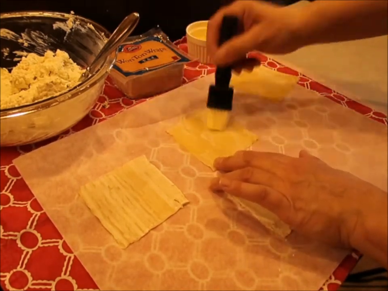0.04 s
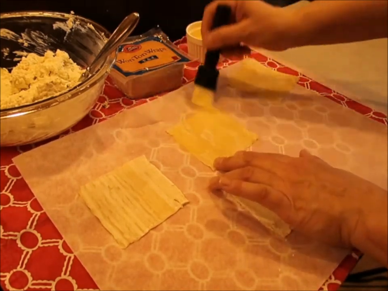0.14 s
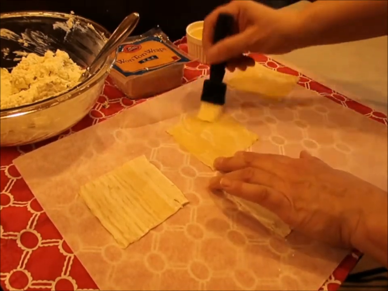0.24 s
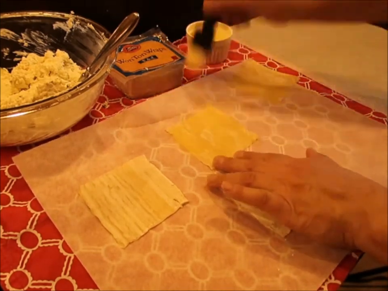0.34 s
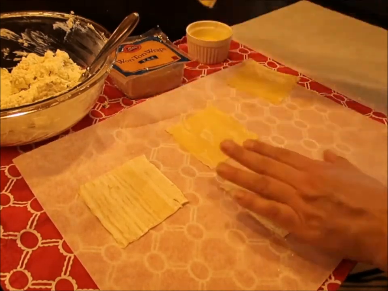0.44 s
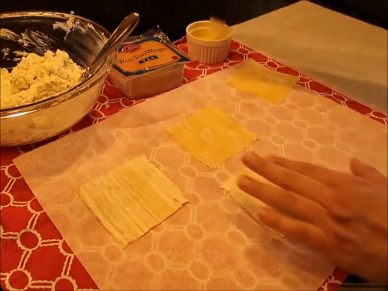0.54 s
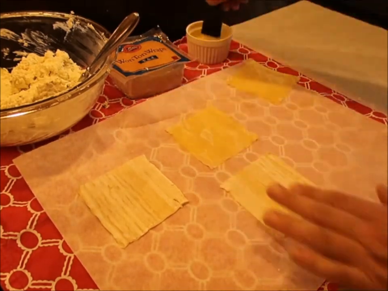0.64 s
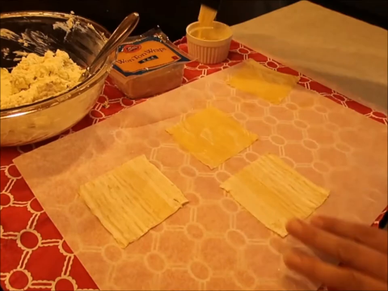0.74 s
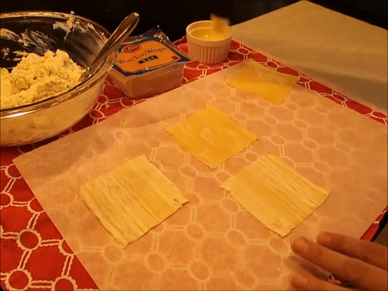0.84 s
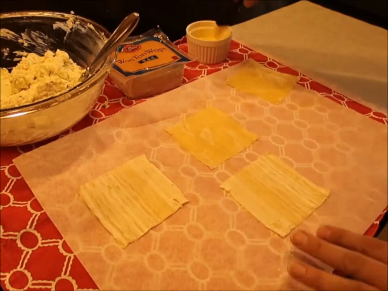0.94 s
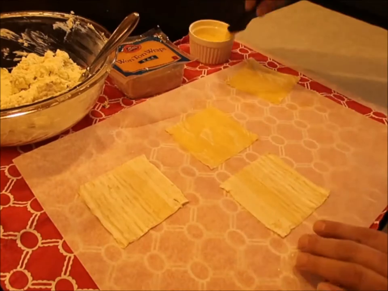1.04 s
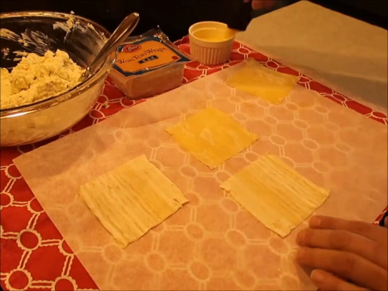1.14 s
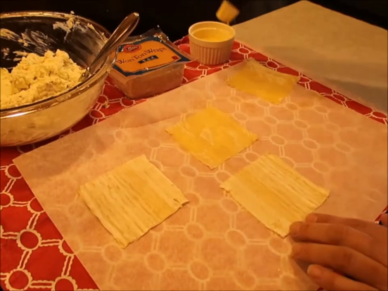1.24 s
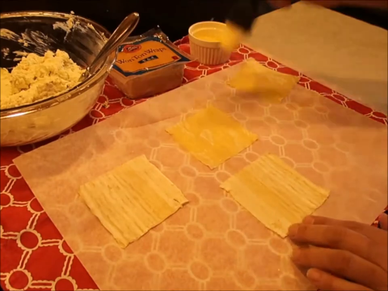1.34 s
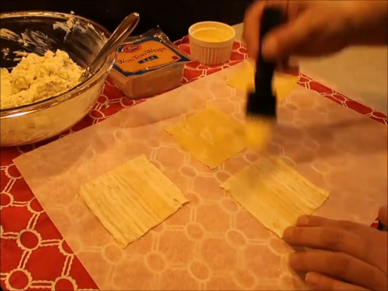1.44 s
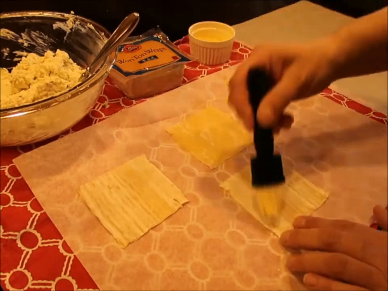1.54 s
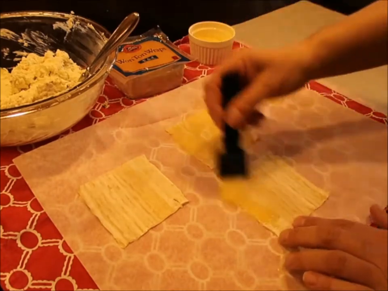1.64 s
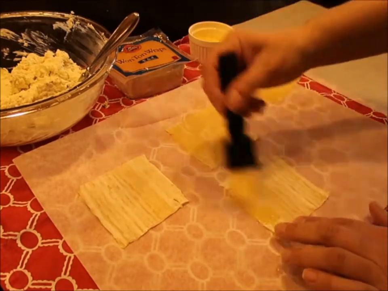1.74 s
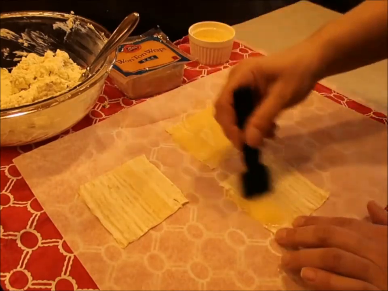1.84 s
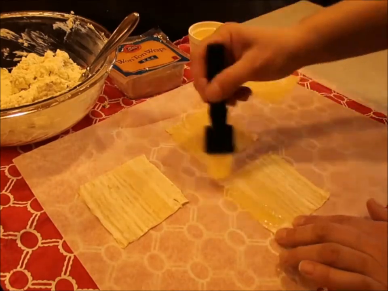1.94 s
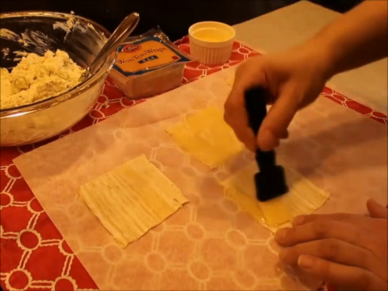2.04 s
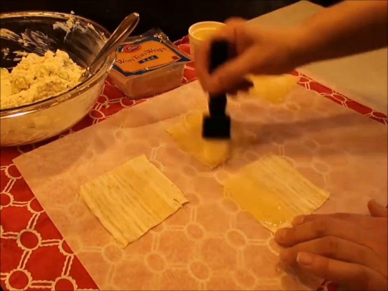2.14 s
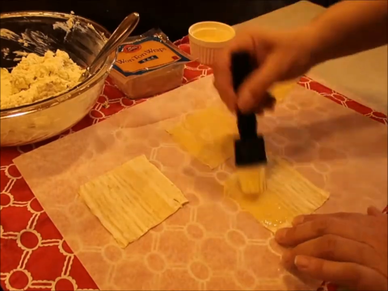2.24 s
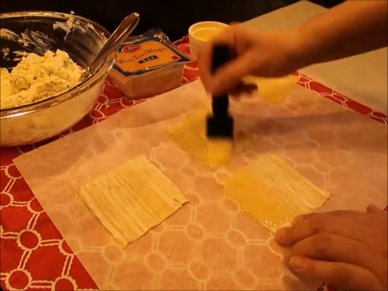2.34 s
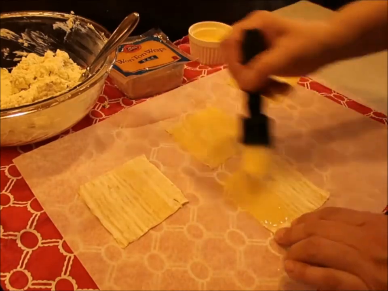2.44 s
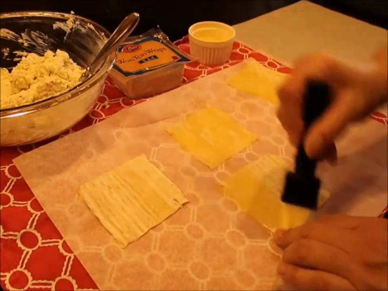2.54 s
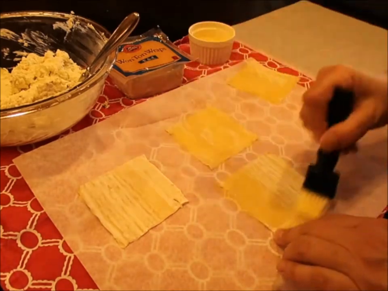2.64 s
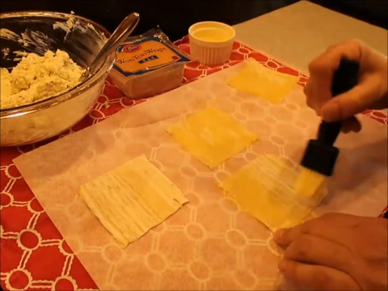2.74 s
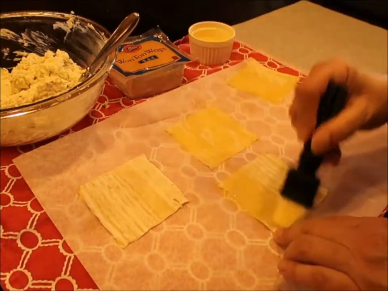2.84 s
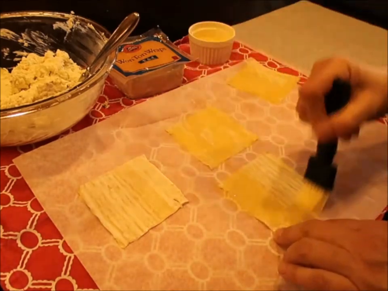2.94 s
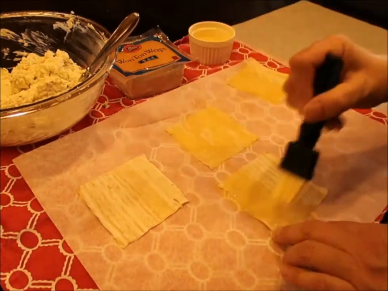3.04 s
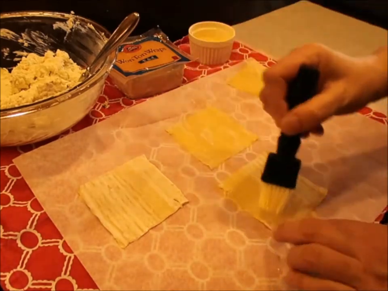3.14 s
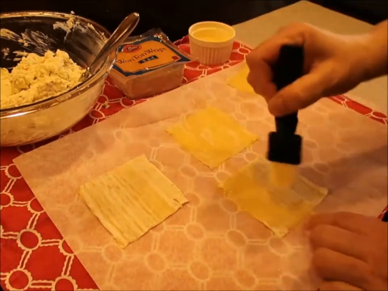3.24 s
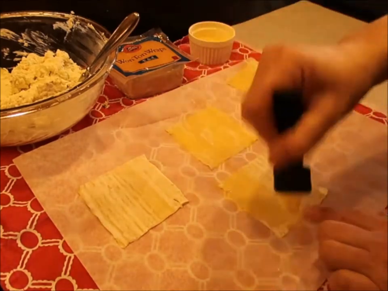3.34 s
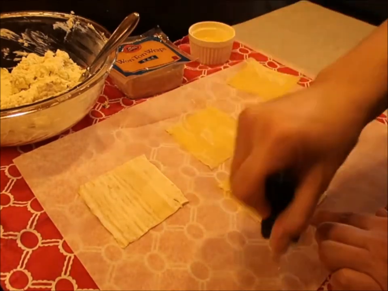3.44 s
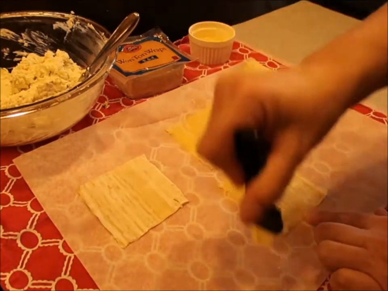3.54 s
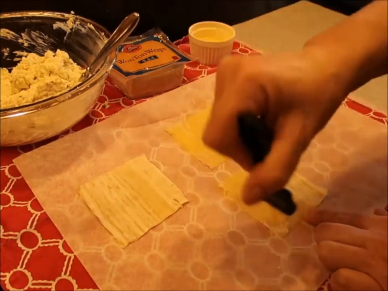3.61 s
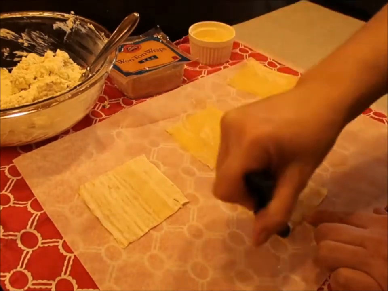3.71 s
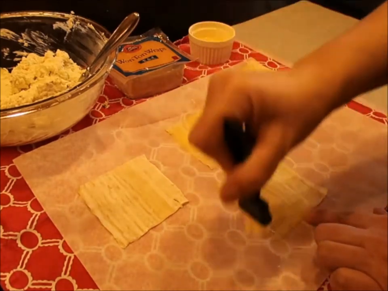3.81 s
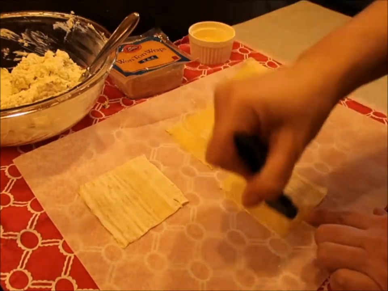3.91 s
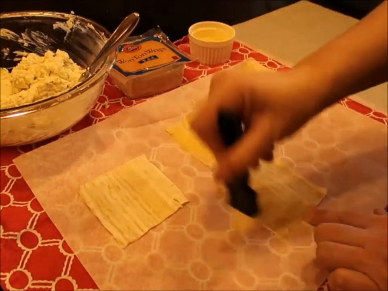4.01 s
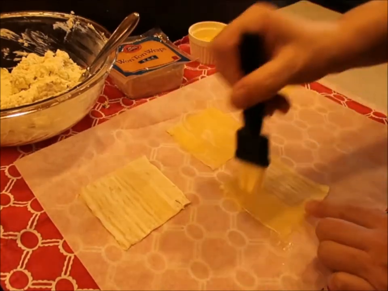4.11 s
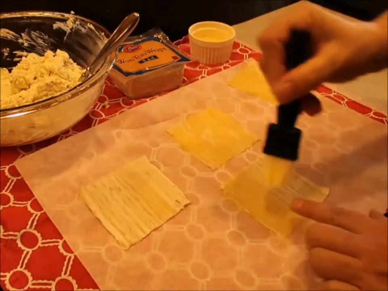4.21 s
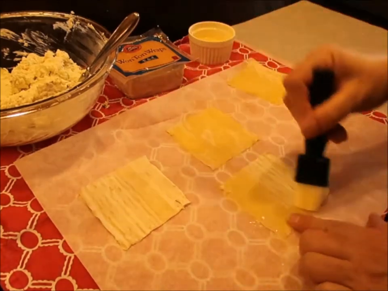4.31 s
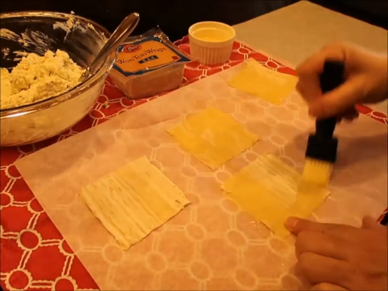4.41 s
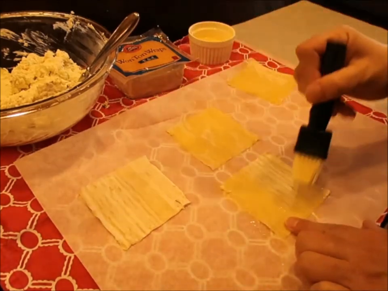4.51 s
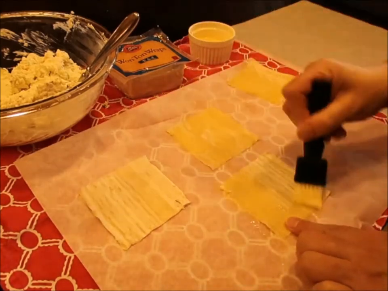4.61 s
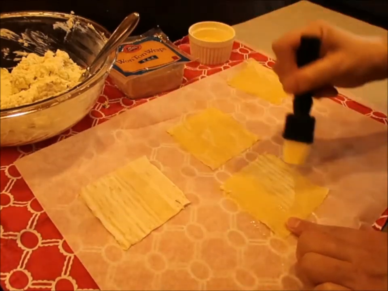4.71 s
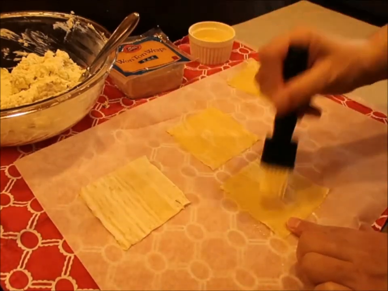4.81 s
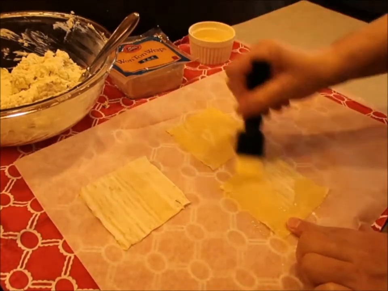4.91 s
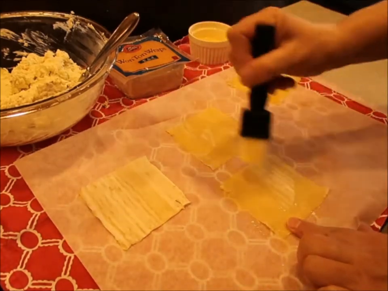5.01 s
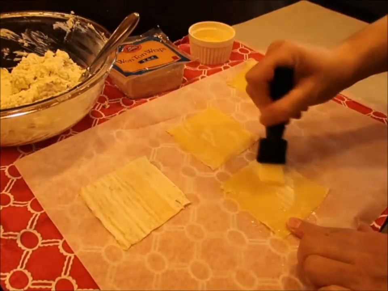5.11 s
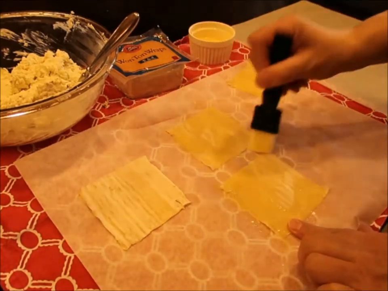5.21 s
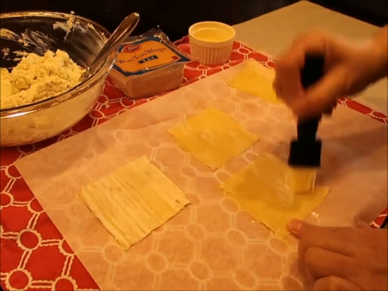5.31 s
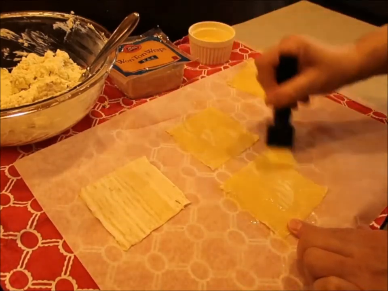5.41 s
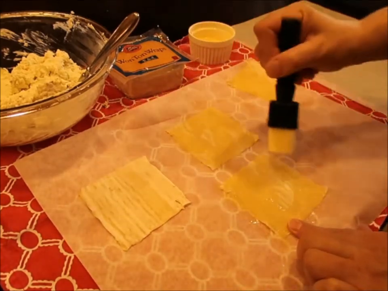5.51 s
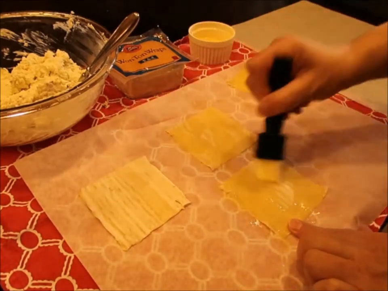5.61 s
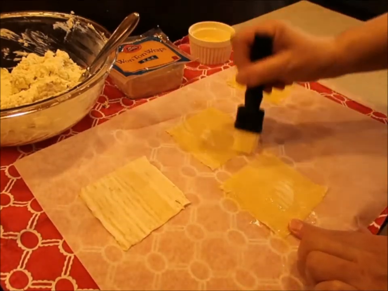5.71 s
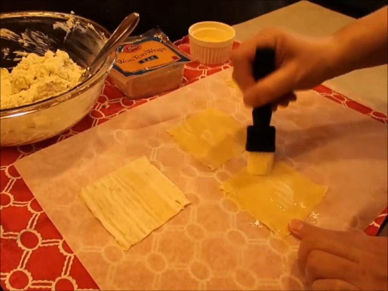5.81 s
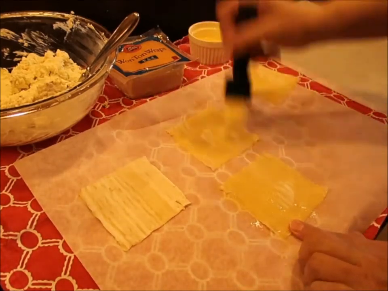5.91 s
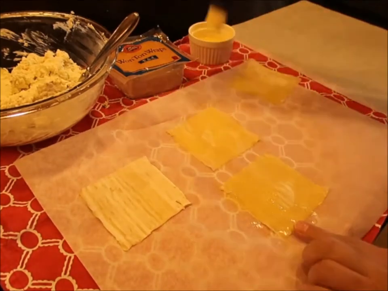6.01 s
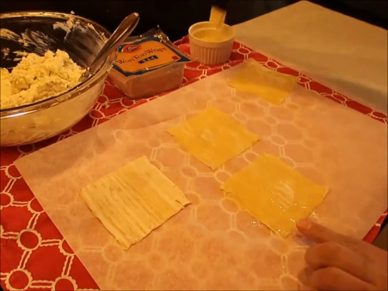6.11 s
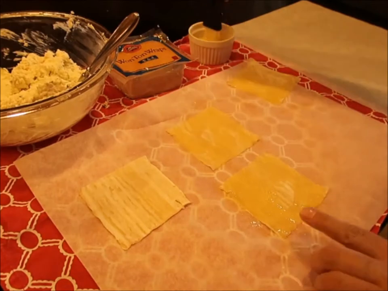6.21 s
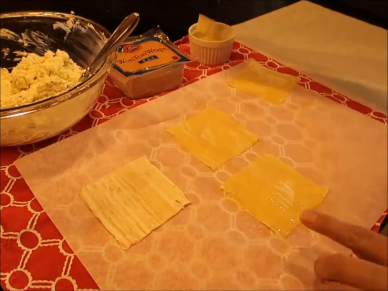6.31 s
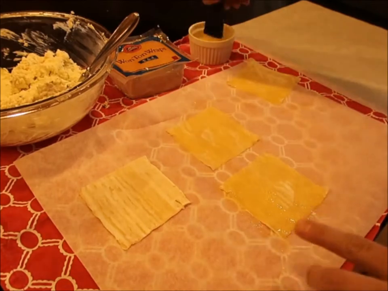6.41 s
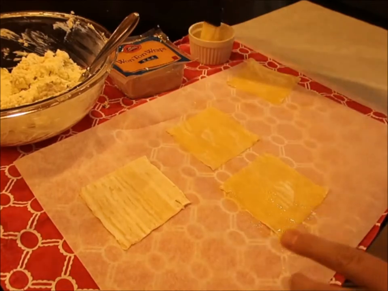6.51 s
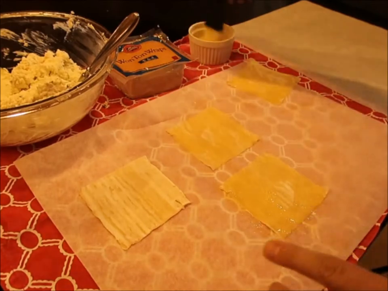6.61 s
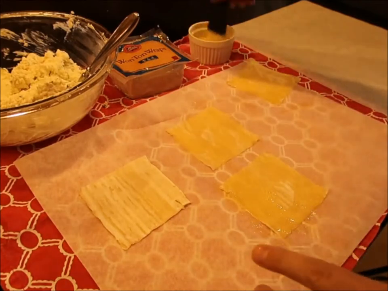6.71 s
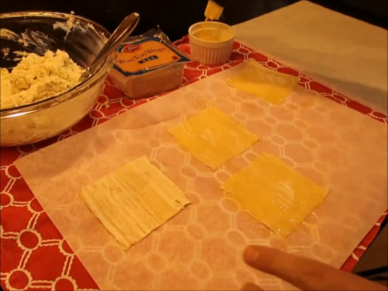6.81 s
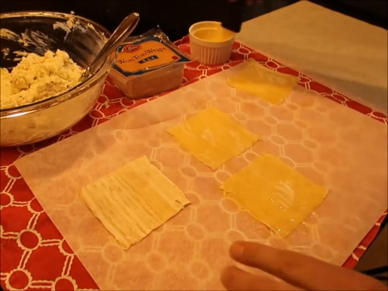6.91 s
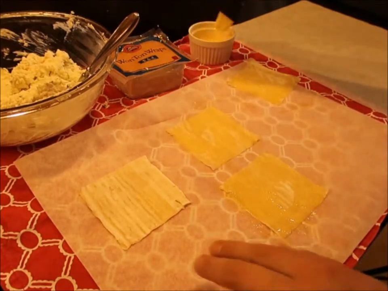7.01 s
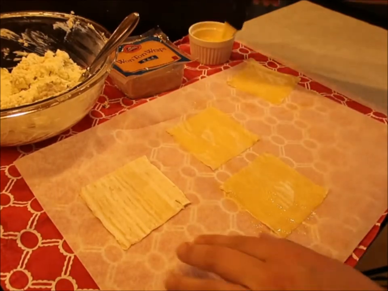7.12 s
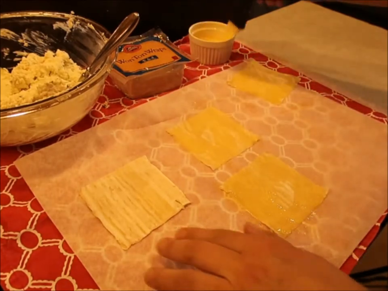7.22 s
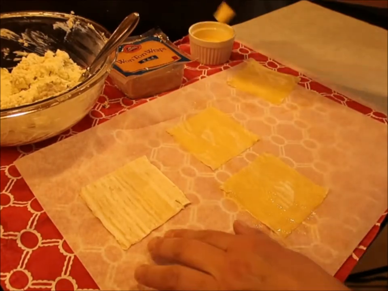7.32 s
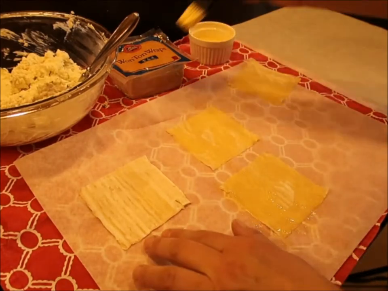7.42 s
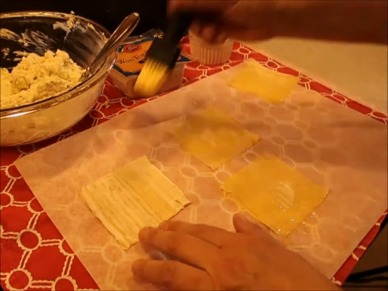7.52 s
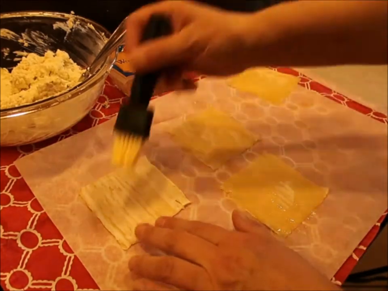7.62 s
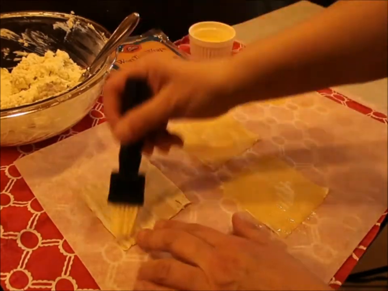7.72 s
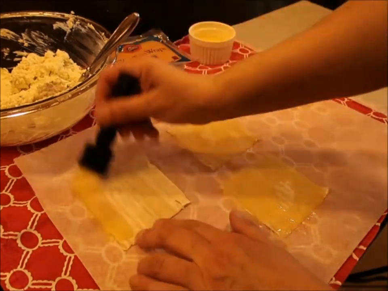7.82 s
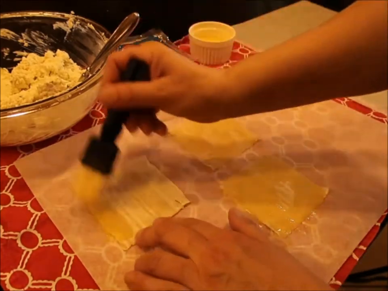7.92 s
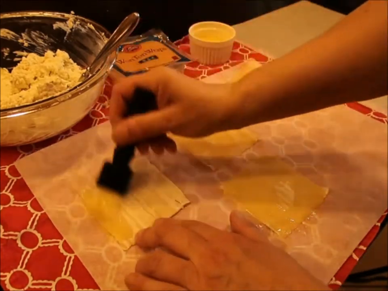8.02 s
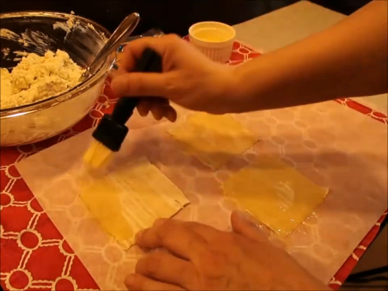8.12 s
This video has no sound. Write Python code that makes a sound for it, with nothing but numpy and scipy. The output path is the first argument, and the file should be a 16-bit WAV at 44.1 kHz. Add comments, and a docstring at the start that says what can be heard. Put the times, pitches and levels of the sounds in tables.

```python
"""A soft pastry brush lands on thin dough sheets lying on paper and swipes across them, close to a stereo microphone.
Bristle slips are shaped noise; each landing adds a crackling snap of the paper and a thump that rings the table's
resonances. The brush clinks a small ceramic cup, made of damped sines, which knocks on the same table; bubbles
are sines of rising pitch. Dull thuds sound further off; the kitchen hums quietly and its walls answer."""
import sys
import numpy as np
from scipy import signal
from scipy.fft import rfft, irfft, next_fast_len
from scipy.io import wavfile
from scipy.ndimage import uniform_filter1d, map_coordinates

SR = 44100
rng = np.random.default_rng(int(sys.argv[2]) if len(sys.argv) > 2 else 0)


def inscribe(sig):
    """Save sig as 16-bit PCM at rate SR to the path in sys.argv[1].

    A 1-D sig is mono; a 2-D sig holds one channel per row.
    Samples are clipped to [-1, 1] before scaling.
    """
    pcm = np.round(np.clip(np.atleast_2d(sig).T, -1, 1) * 32767)
    wavfile.write(sys.argv[1], SR, pcm.astype(np.int16))


N = 359415

# One stroke of the brush: it lands, drags and flicks off. Each row: landing in seconds, flick in seconds,
# snap level in dB, relative table thump in dB, paper level at the flick in dB, drag hiss in dB,
# flick hiss in dB, flick width in seconds.
STROKE_ROWS = [(0.0, 0.007, -41.5, -66, -49.5, -63, -42, 0.038),
               (0.1395, 0.235, -45, -31.5, -47.5, -83, -45, 0.045),
               (0.326, 0.406, -44, -33.5, -48.5, -72, -37.5, 0.031),
               (1.682, 1.75, -61, -46, -60.5, -80, -51, 0.056),
               (1.904, 1.994, -58, -43.5, -57, -72, -48.5, 0.059),
               (2.138, 2.232, -51.5, -40.5, -55, -66, -49.5, 0.027),
               (2.364, 2.442, -50.5, -37.5, -55, -69.5, -46, 0.025),
               (2.665, 2.755, -46, -41.5, -49.5, -63, -50.5, 0.11),
               (2.956, 3.041, -49.5, -70, -51.5, -61, -56.5, 0.059),
               (3.5166, 3.593, -45.5, -35.5, -51, -66, -44, 0.031),
               (3.78, 3.876, -46, -32, -50.5, -58.5, -43, 0.019),
               (4.0327, 4.114, -48, -34.5, -50.5, -69.5, -40.5, 0.018),
               (4.385, 4.527, -51.5, -73, -56.5, -83, -47, 0.043),
               (4.6732, 4.786, -39.5, -40.5, -55, -58, -59, 0.027),
               (4.948, 5.052, -47.5, -34.5, -53.5, -72, -50.5, 0.048),
               (5.189, 5.287, -45.5, -29, -53, -77, -53, 0.05),
               (5.4257, 5.539, -32.5, -27, -54.5, -59.5, -52, 0.058),
               (5.703, 5.799, -45.5, -29.5, -54.5, -68.5, -49.5, 0.038),
               (5.911, 5.969, -45.5, -32, -85, -82, -52, 0.01),
               (6.0197, 6.133, -39.5, -50, -48, -91, -64, 0.025),
               (7.774, 7.928, -52, -46.5, -48, -71, -43, 0.054),
               (8.076, 8.129, -54.5, -50, -54, -75, -54, 0.039)]
# Treble of the wet bristles and of the landings. Each row: frequency in Hz, relative level in dB.
HISS_COLOUR = [(1500, -38), (3500, -25), (6000, -3.5), (9000, -3), (12000, -1), (14500, -8.5), (16000, -20)]


def strokes():
    """Slipping bristles make the paper sound the middle and hiss in the treble, swelling to the flick."""
    # The paper rustles and creases between strokes. Each row: peak in seconds, paper level in dB,
    # hiss level in dB, dull crumple level in dB, width in seconds.
    rustles = [(0.436, -36, -53, -46, 0.03), (1.081, -54, -54, -85, 0.022), (1.22, -61, -70, -75, 0.064),
               (1.52, -65.5, -76, -82, 0.071), (3.37, -73, -71, -77, 0.059), (3.56, -53.5, -61, -88, 0.061),
               (4.199, -56, -81, -69, 0.066), (4.445, -56, -58.5, -87, 0.063),
               (5.87, -53.5, -69, -100, 0.079), (6.06, -55.5, -67, -90, 0.36),
               (6.24, -79, -113.5, -83, 0.036), (6.345, -63.5, -73, -86, 0.072),
               (7.0, -66, -74, -90, 0.034), (7.31, -71, -76, -81, 0.018), (7.9, -70, -60, -65, 0.18)]
    # Spectra of the usual scrape, a brighter one and a dull crumple. Each row: frequency in Hz, relative level in dB.
    scrape_colour = [(500, -2.5), (1200, -5.5), (2500, 3.5), (4000, 3), (6500, -17.5), (10000, -32),
                     (16000, -74)]
    bright_colour = [(1200, -37), (2500, -24), (4000, -3), (5200, 4), (6500, 0), (10000, -6), (16000, -64)]
    crumple_colour = [(300, -3), (700, -10.5), (1300, 5.5), (1900, -6), (3000, -27), (16000, -77)]
    # How bright the scrape is. Each row: time in seconds, share of the brighter scrape from 0 to 1.
    brighter = [(0, 0.04), (.4, 0.32), (.46, 0.14), (1.7, 0.52), (2.4, 0.04), (2.75, 0.57), (3.6, 0.84),
                (4.1, 0.54), (4.2, 0.35), (4.8, 0.33), (5.5, 0.34), (6.1, 0.39), (7.9, 0.47)]
    drag_rise_s, lift_db_per_s = 0.0092, 402  # the drag fades once the brush is off
    paper_swell_db = 9.5  # the paper's flick over its drag

    clock = np.arange(N) / SR
    paper, hiss, dull = np.zeros((3, N))
    for land, flick, _, _, paper_db, drag_db, flick_db, width in STROKE_ROWS:
        near = around(flick)
        t = clock[near]
        drag = np.clip((t - land) / drag_rise_s, 0, 1) * amp(-lift_db_per_s * np.maximum(t - flick, 0))
        paper[near] += amp(paper_db - paper_swell_db) * drag + swell(t, flick, paper_db, width)
        hiss[near] += amp(drag_db) * drag + swell(t, flick, flick_db, width)
    for s, paper_db, hiss_db, dull_db, width in rustles:
        near = around(s)
        for level, db in [(dull, dull_db), (paper, paper_db), (hiss, hiss_db)]:
            level[near] += swell(clock[near], s, db, width)

    grit = slips(spiky_db=3, patchy_db=2.2)
    share = curve(brighter)
    scrape = (1 - share) * coloured(grit, scrape_colour) + share * coloured(grit, bright_colour)
    crumple = dull * coloured(grit, crumple_colour)
    wet_hiss = hiss * coloured(slips(spiky_db=3.3, patchy_db=2.3), HISS_COLOUR)
    return paper * scrape + crumple + wet_hiss


def around(s):
    """The samples from a quarter second before s to a third after it."""
    return slice(max(round(s * SR) - SR // 4, 0), round(s * SR) + SR // 3)


def swell(t, s, db, width):
    """A bell that peaks at s, 23.6 dB down one width before it; it falls a little faster."""
    return amp(db - 23.6 * ((t - s) / np.where(t < s, width, 0.78 * width)) ** 2)


def slips(spiky_db, patchy_db):
    """Countless bristle slips of uneven size, in drifting patches of time and pitch, from two spots of the sheet."""
    grit = rng.standard_normal((2, N)) * amp(spiky_db * wobble(1500))
    z = signal.stft(grit, nperseg=256)[2]
    field = uniform_filter1d(rng.standard_normal(z.shape[1:]), 5, 0)  # over pitch
    field = uniform_filter1d(field, 8, 1)  # over time
    return signal.istft(z * amp(patchy_db * unit(field)), nperseg=256)[1][:, :N]


def dabs():
    """The paper snaps in short crackling bursts, longer the harder; a landing also pushes the table."""
    # Snaps of the paper between landings. Each row: time in seconds, level in dB, treble level in dB.
    paper_snaps = [(.1594, -61, -61), (0.391, -38.5, -55), (0.428, -33.5, -60), (0.436, -37.5, -61),
                   (0.453, -35, -54), (0.673, -60.5, -61), (1.65, -54.5, -66), (2.423, -54, -52),
                   (3.528, -52, -58), (3.795, -47.5, -62), (3.81, -50, -45), (4.181, -46, -75),
                   (4.201, -50.5, -74), (4.428, -48, -51.5), (4.586, -53, -73), (5.741, -48.5, -59),
                   (5.869, -48.5, -66), (5.888, -53, -62), (6.088, -46.5, -68), (6.121, -40, -54),
                   (6.1534, -63, -69), (6.395, -56, -79), (6.732, -67, -55.5), (6.752, -57, -57),
                   (7.754, -57.5, -64), (7.838, -46.5, -49)]
    # Spectrum of a snap. Each row: frequency in Hz, relative level in dB.
    snap_colour = [(300, -6), (1000, 2.5), (1600, 7), (2500, 10.5), (4500, 8.5), (8000, -3), (16000, -24)]
    snap_rise_s, landing_rise_s, soft_rise_s = 0.002, 0.0055, 0.011
    firm_db = -41  # a landing that thumps no harder than this unfolds more slowly
    treble_over_drag_db = 8.5  # treble of the landing over the drag hiss
    t60_s, hold_s = 0.035, 0.0052  # the hold is that of a snap at -30 dB
    thump_lag_s = 0.0051  # the bristles fold before the handle's weight arrives
    rebound_s, rebound_db = 0.017, -9.5  # the brush springs back on the table once

    bursts = []
    for land, _, snap_db, thump_db, _, drag_db, *_ in STROKE_ROWS:
        rise = landing_rise_s if thump_db > firm_db else soft_rise_s
        bursts.append((land, snap_db, drag_db + treble_over_drag_db, rise))
    bursts += [(*row, snap_rise_s) for row in paper_snaps]

    snap, fizz, force = np.zeros((3, N))
    t = np.arange(SR // 8) / SR
    for s, db, treble_db, rise in bursts:
        hold = hold_s * amp(db + 30)
        onset = np.sin(np.pi / 2 * np.minimum(t / rise, 1)) ** 2
        fade = onset * amp(-60 * np.maximum(t - rise - hold, 0) / t60_s)
        add(snap, s, amp(db) * fade)
        add(fizz, s, amp(treble_db) * fade)
    for land, _, _, thump_db, *_ in STROKE_ROWS:
        for lag, loss_db in [(0, 0), (rebound_s, rebound_db)]:
            thump = push(contact=0.00029, t60=0.025, loose=0.12, hold=0.021)
            add(force, land + thump_lag_s + lag, amp(thump_db + loss_db) * thump)

    crackle = snap * coloured(slips(spiky_db=2.5, patchy_db=1), snap_colour)
    return crackle + fizz * coloured(rng.standard_normal((2, N)), HISS_COLOUR), force


def table(thumps):
    """Brush and cup press on one table top at different spots; being light, they hardly move the lowest modes."""
    # The cup knocks the table, first with two quick bounces. Each row: time in seconds, relative strength in dB,
    # contact time in seconds, rattle t60 in seconds.
    cup_knocks = [(1.1654, -14.5, 0.00019, 0.089), (1.1722, -14.5, 0.0002, 0.14),
                  (1.1798, -15.5, 0.00024, 0.17), (6.77, -50, 0.000038, 0.036), (7.452, -50, 0.00026, 0.22)]
    # Resonances of the table top. Each row: frequency in Hz, width in Hz (before the cup's damping),
    # relative level under the brush in dB, under the cup in dB.
    resonances = [(60.5, 12.6, 19.5, 2), (120.6, 33, 13, 14.5), (172, 23.7, 4.5, 8), (304, 39, 11, -0.5),
                  (438, 62, 2, 3), (544, 40, 5.5, 5), (749, 83, -0.5, 1.5), (968, 87, 0.5, -1.5),
                  (1135, 89, -1.5, -3.5), (1290, 52, -7, -7), (1580, 120, 1, -14), (2080, 120, 7, -27),
                  (2350, 77, -19.5, -34), (3200, 1300, -30, -39)]
    # The brush's spot favours the upper modes. Each row: time in seconds, gain in dB.
    woody = [(0, 7.5), (1, 5), (2.2, -0.5), (3.5, -7), (4.1, -1), (4.95, 2.5), (5.2, 9), (5.43, -1.5),
             (5.7, 6.5), (5.92, -0.5), (7.8, 2)]
    upper_hz = 380
    cup_damps = 1.7  # the cup widens the resonances that it rests on
    brush_low_hz, brush_high_hz = 300, 1100

    cup_force = np.zeros(N)
    for s, db, contact, t60 in cup_knocks:
        add(cup_force, s, amp(db) * push(contact, t60, loose=0.16, hold=0.0078))

    def light(hz):
        shelf = (0.17 + 1j * hz / 450) / (1 + 1j * hz / 450)
        return shelf * (1j * hz / (80 + 1j * hz)) ** 2

    def soft(hz):
        return 1j * hz / (brush_low_hz + 1j * hz) / (1 + 1j * hz / brush_high_hz) ** 2

    lower = [(hz, width, db) for hz, width, db, _ in resonances if hz < upper_hz]
    upper = [(hz, width, db) for hz, width, db, _ in resonances if hz >= upper_hz]
    under_cup = [(hz, cup_damps * width, db) for hz, width, _, db in resonances]
    pressed = filtered(thumps, soft)
    under_brush = body(pressed, lower) + body(pressed * amp(curve(woody)), upper)
    return under_brush + body(filtered(cup_force, light), under_cup)


def push(contact, t60, loose, hold):
    """A rounded force pulse, then a rattle of smaller contacts of the same softness that holds and dies."""
    t = np.arange(SR // 6) / SR
    shape = t * np.exp(-t / contact)
    fade = amp(-60 * np.maximum(t - hold, 0) / t60)
    rattle = rng.standard_normal(len(t)) * loose / np.sqrt(contact * SR + 8) * fade
    rattle[0] = 1  # the blow itself
    return signal.fftconvolve(rattle, shape / shape.sum())[:len(t)]


def body(force, peaks):
    """A solid answers a force with its resonances: (Hz, width Hz, relative dB)."""
    def modes(f):
        return sum(amp(db) * 1j * f * w / (c * c - f * f + 1j * f * w) for c, w, db in peaks)
    return amp(31.5) * filtered(force, modes)


def cup():
    """The ceramic rings and beats on its lowest note; bubbles rise in pitch as they die."""
    # The cup is touched; the brush in it damps the ring. Each row: time in seconds, level in dB,
    # extra level of the upper modes in dB, reference ring t60 in seconds.
    clinks = [(1.068, -54, 9, .12), (1.0785, -71, 14, .05), (1.177, -44, -30, .14), (6.994, -60, -10, .13)]
    # Modes of the cup; the lowest note leaves a close pair beating behind it. Each row: frequency in Hz,
    # relative level in dB, share of the ring time, sign.
    cup_modes = [(2859, 0, 1, 1), (2855, -10, 4.5, 1), (2871.5, -12, 4, -1), (6869, -3, 1.7, 1),
                 (6990, -4, 1, 1), (5373, -7, .4, 1), (9500, -7, .3, 1)]
    # Bristle holder on the rim. Each row: frequency in Hz, relative level in dB.
    tick_colour = [(1500, -52), (3500, -32), (5800, 0), (6900, 19), (9000, -8), (16000, -28)]
    # Bubbles in the cup. Each row: time in seconds, starting frequency in Hz, level in dB, t60 in seconds,
    # share by which the cycle count has run ahead after one t60.
    bubbles = [(6.775, 1260, -55, .16, 0.02), (6.829, 1900, -51, .055, .25), (6.85, 2200, -63, .08, .04)]

    out, t = np.zeros(N), np.arange(SR // 2) / SR
    for s, db, upper_db, t60 in clinks:
        modes = [(hz, level + upper_db * (hz > 4000), share * t60, sign) for hz, level, share, sign in cup_modes]
        tick = amp(upper_db + 12 - 60 * t / 0.014) * coloured(rng.standard_normal(len(t)), tick_colour)
        add(out, s, amp(db) * (ring(modes, t, scatter_db=1) + tick))
    for s, hz, db, t60, rise in bubbles:
        level = amp(db - 60 * t / t60) * (1 - np.exp(-t / 0.00058))
        cycles = hz * t * (1 + rise * np.minimum(t / t60, 1))
        add(out, s, level * np.sin(2 * np.pi * cycles))
    return out


def ring(modes, t, scatter_db):
    """Damped sines, at new strengths for each blow."""
    out = np.zeros(len(t))
    for hz, db, t60, sign in modes:
        level = amp(db + scatter_db * rng.standard_normal() - 60 * t / t60)
        out += sign * level * np.sin(2 * np.pi * hz * t)
    return out


def dull_thuds():
    """Soft blows on something hollow further off press on a while and ring its low resonances."""
    # Each row: time in seconds, relative strength in dB, rattle t60 in seconds.
    thuds = [(1.063, -45, 0.082), (6.754, -37.5, 0.17), (7.0416, -42, 0.12)]
    # What the thuds ring. Each row: frequency in Hz, width in Hz, relative level in dB.
    hollow = [(117, 24, 1), (154, 38, 3.5), (207, 67, -7), (288, 42, -11)]
    force = np.zeros(N)
    for s, db, t60 in thuds:
        add(force, s, amp(db + 13.0) * push(contact=0.00054, t60=t60, loose=0.19, hold=0.03))
    return body(force, hollow)


def kitchen():
    """Appliance rumble that comes and goes and a low uneven stir, under a steady hush, all shaped noise."""
    # Spectra of rumble, stir and hush. Each row: frequency in Hz, relative level in dB.
    rumble_colour = [(20, -46), (35, -5.5), (48, -11.5), (57, 4), (66, -4.5), (100, -10), (120, -3.5),
                     (140, -11), (250, -55)]
    stir_colour = [(90, -24), (200, -4), (350, 5), (520, -3.5), (800, -46), (2000, -50)]
    hush_colour = [(60, -21), (150, -2.5), (280, -1.5), (400, -5), (700, -8), (1400, -11.5), (4000, -17.5),
                   (10400, -28.5), (14000, -38), (16000, -75)]
    # Each row: frequency in Hz, left-right likeness from -1 to 1.
    air_alike = [(60, .997), (110, .997), (200, 0.62), (380, 0.16), (700, -0.046), (15000, -0.25)]
    # Each row: time in seconds, mean rumble level in dB.
    hum = [(0.0, -54.5), (1.27, -53.5), (2.84, -56.5), (3.27, -58.5), (3.88, -57), (4.47, -59), (5.2, -57),
           (6.5, -63), (7.1, -61), (7.6, -63), (8.15, -59)]
    hush_db, stir_db, stir_swing_db = -59.5, -69.5, 4.5

    def air(colour):
        return coloured(spread(rng.standard_normal((2, N)), air_alike), colour)

    rumble, stir, hush = air(rumble_colour), air(stir_colour), air(hush_colour)
    uneven_db = stir_db + stir_swing_db * (wobble(1.97) + wobble(9.8))
    hum_db = curve(hum) + 0.7 * wobble(8.8)
    return amp(hum_db) * rumble + amp(uneven_db) * stir + amp(hush_db) * hush


def walls(x):
    """Each frequency of the room's answer dies at its own speed; each quarter second meets a new tail."""
    # Each row: frequency in Hz, t60 in seconds.
    wall_t60 = [(100, 0.33), (500, 0.36), (2000, 0.36), (5000, 0.32), (12000, 0.22)]
    # Each row: frequency in Hz, left-right likeness from -1 to 1.
    wall_alike = [(150, 1), (1000, 0.94), (2500, 0.91), (5000, 0.31), (10000, 0.017)]
    out, step = np.zeros((2, N + SR)), SR // 4
    delay = 180  # samples before the first answer
    for k in range(0, N, step):
        hz, t, z = signal.stft(rng.standard_normal((2, SR // 2)), SR, nperseg=256)
        fade = amp(-60 * t / along(wall_t60, hz)[:, None])
        tail = spread(signal.istft(z * fade, SR, nperseg=256)[1], wall_alike)
        wet = signal.fftconvolve(x[None, k:k + step], tail / np.linalg.norm(tail[0]), axes=1)
        out[:, k + delay:k + delay + wet.shape[1]] += wet
    return out[:, :N]


def ports(pair):
    """The farther microphone port hears the brush on the paper a little later."""
    # Where the brush is. Each row: time in seconds, microseconds by which the left port hears it later.
    place = [(0, 9), (2.4, 18), (2.7, 30.5), (5.05, 28.5), (6.2, 31), (7.7, -14), (7.95, -24)]
    hz, t, z = signal.stft(pair, SR, nperseg=256)
    lag_s = np.interp(t, *np.transpose(place)) / 1e6
    turn = np.exp(-1j * np.pi * hz[:, None] * lag_s)  # half the lag on each side
    return signal.istft(z * [turn, turn.conj()], SR, nperseg=256)[1][:, :N]


def amp(db):
    """Decibels to amplitude."""
    return 10 ** (np.asarray(db) / 20)


def unit(x):
    """x at rms 1."""
    return x / np.sqrt(np.mean(x ** 2) + 1e-20)


def along(points, hz):
    """(Hz, value) points read on a log frequency axis."""
    f, v = np.transpose(points)
    return np.interp(np.log(hz + 1), np.log(f + 1), v)


def curve(rows):
    """One value per sample from (seconds, value) rows."""
    return np.interp(np.arange(N) / SR, *np.transpose(rows))


def wobble(rate):
    """A smooth random curve, rate knots a second."""
    knots = rng.standard_normal(int(N * rate / SR) + 4)
    return map_coordinates(knots, [np.arange(N) * rate / SR])


def filtered(x, response):
    """x times a response of frequency."""
    m = next_fast_len(x.shape[-1] + 8192)
    return irfft(rfft(x, m) * response(np.fft.rfftfreq(m, 1 / SR)), m)[..., :x.shape[-1]]


def coloured(x, spectrum):
    """x filtered by the given spectrum, then set to rms 1."""
    return unit(filtered(x, lambda hz: amp(along(spectrum, hz))))


def spread(pair, alike):
    """Left and right out of two unrelated signals, as alike as the table says."""
    def mid_side(hz):
        turn = np.arccos(np.clip(along(alike, hz), -1, 1)) / 2
        return np.array([np.cos(turn), np.sin(turn)])
    mid, side = filtered(pair, mid_side)
    return np.array([mid + side, mid - side])


def add(out, s, sound):
    """Lay a sound into out at s seconds."""
    part = out[round(s * SR):][:len(sound)]
    part += sound[:len(part)]


def scene():
    """Brush, table and cup close by, thuds further off, the walls' answer and the kitchen."""
    # The sheet sounds over its whole width. Each row: frequency in Hz, left-right likeness from -1 to 1.
    near_alike = [(500, 1), (2000, 1), (5000, 1), (9000, 0.4), (15000, 0.9)]
    snaps, thumps = dabs()
    paper = strokes() + snaps
    solid = table(thumps) + dull_thuds()
    china = cup()
    echo = walls(amp(-6.0) * paper[0] + amp(-7.5) * solid + amp(-18) * china)
    return ports(spread(paper, near_alike)) + solid + china + echo + kitchen()


def record(dry):
    """The recorder keeps nothing from 15.9 kHz up."""
    return filtered(dry, lambda hz: hz < 15900)


dry = scene()
out = record(dry)
inscribe(out)
```